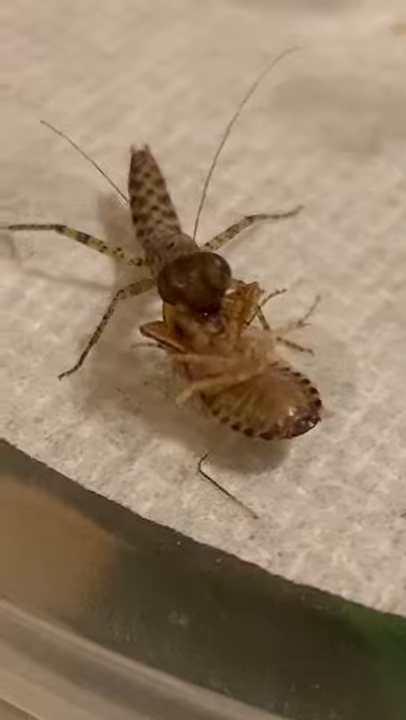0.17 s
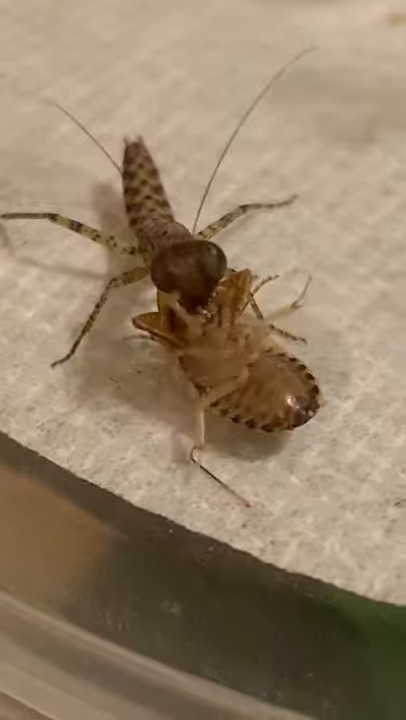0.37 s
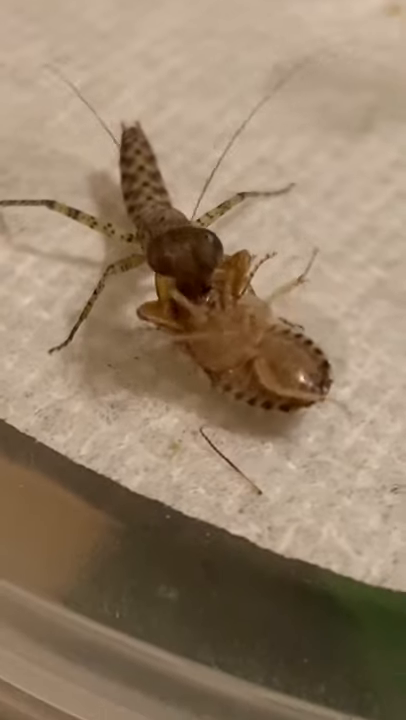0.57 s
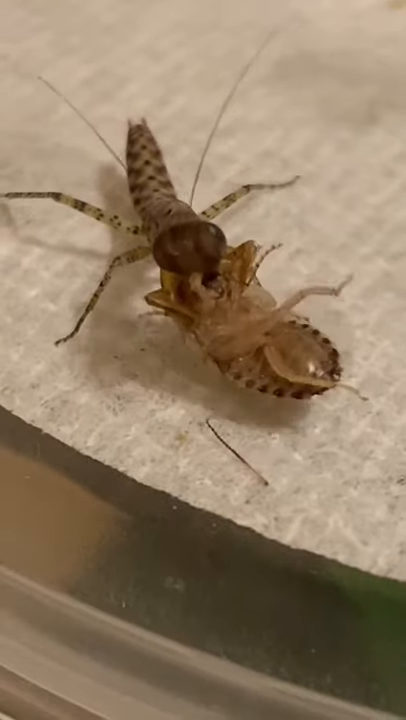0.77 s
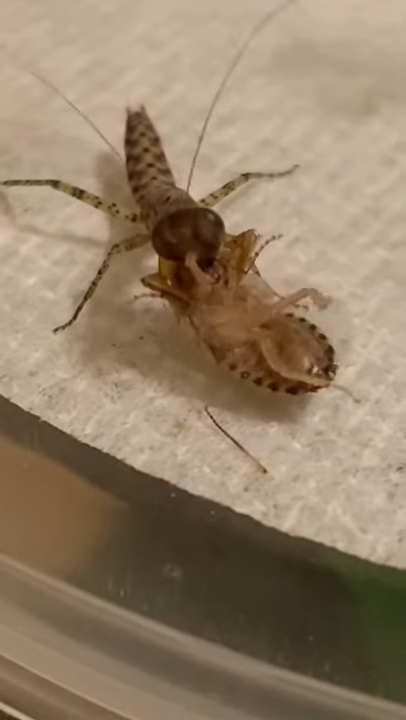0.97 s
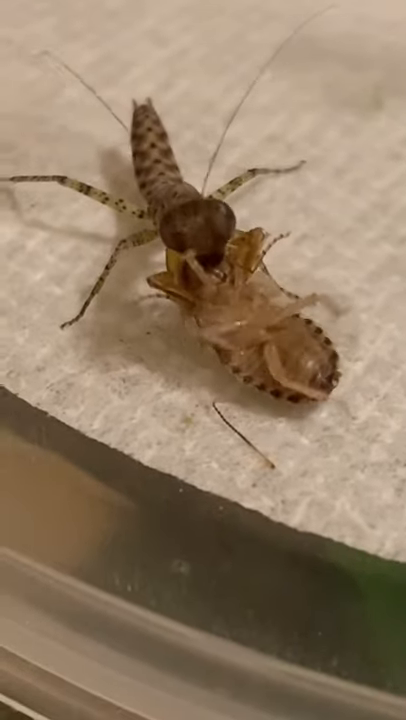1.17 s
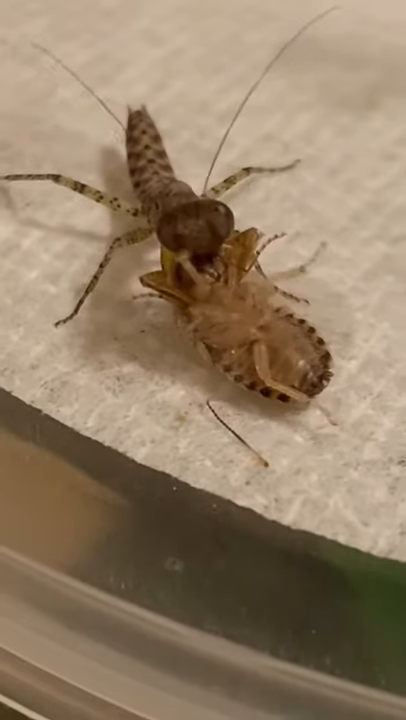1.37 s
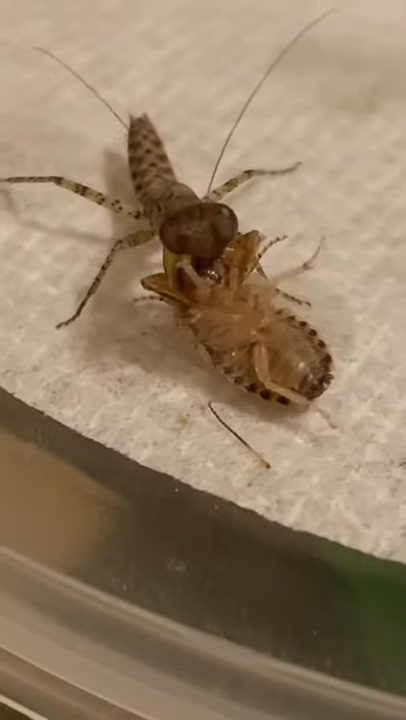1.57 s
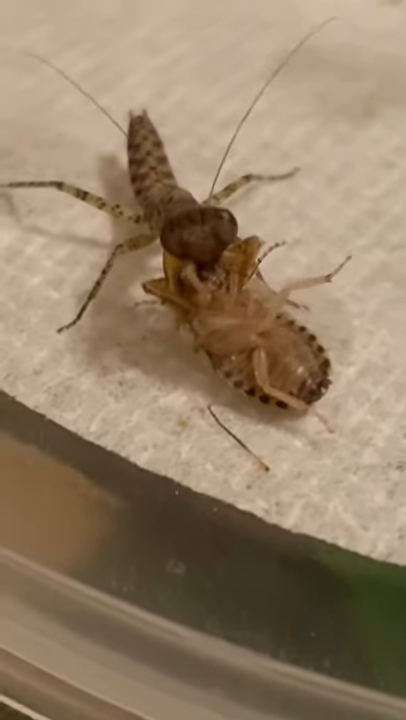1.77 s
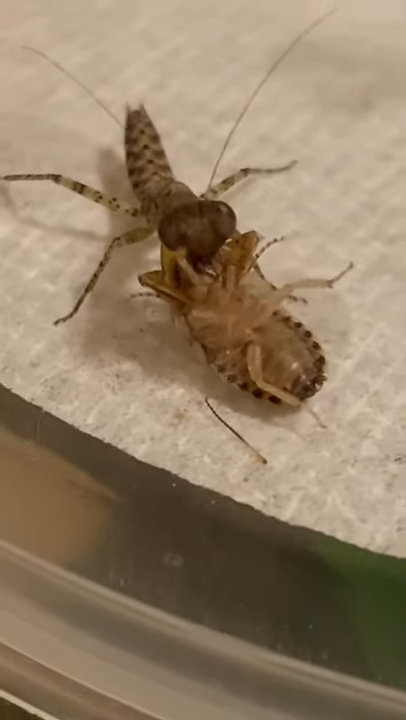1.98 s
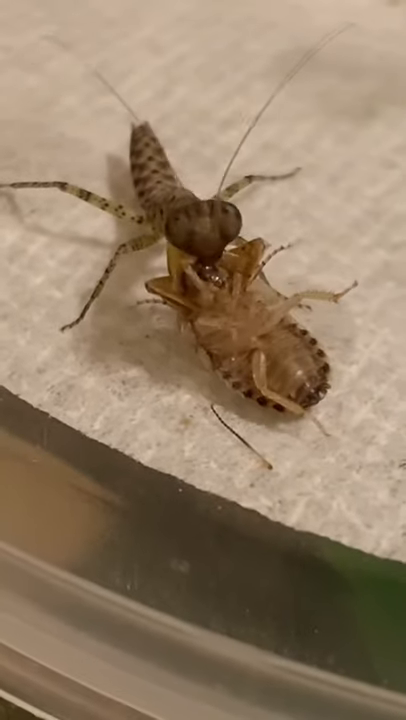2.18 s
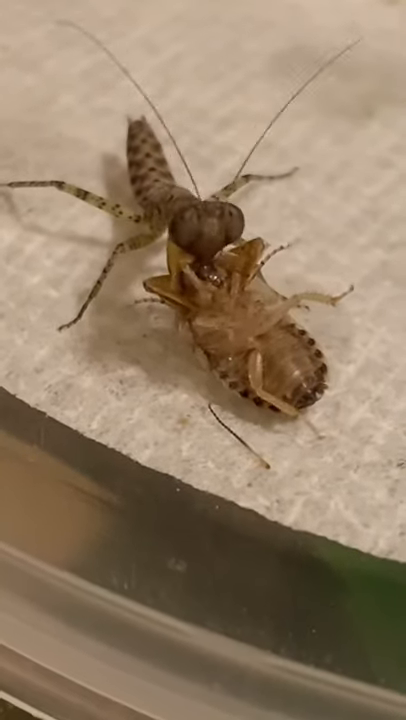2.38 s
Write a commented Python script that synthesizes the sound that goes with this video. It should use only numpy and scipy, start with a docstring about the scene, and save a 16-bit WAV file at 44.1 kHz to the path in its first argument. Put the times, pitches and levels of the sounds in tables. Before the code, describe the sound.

Tiny snaps and crackles of a mantis eating a roach in a plastic tub.

```python
"""Mantis eating a roach

A small mantis chews a roach on paper towel in a plastic tub, close to the microphone.
Bits of shell snap in sprays of clicks, the jaws grind out a fine crackle, legs scratch on the
paper, and a few dull taps ring the tub. Under it lie the room's rumble, hum and soft hiss."""
import sys
import numpy as np
from scipy import signal
from scipy.fft import rfft, irfft
from scipy.io import wavfile
from scipy.ndimage import uniform_filter1d

SR = 44100
rng = np.random.default_rng(int(sys.argv[2]) if len(sys.argv) > 2 else 0)


def dump_mix(stems):
    """Bounce the given channels to the path in sys.argv[1] as a 16-bit WAV at rate SR."""
    frames = np.atleast_2d(stems).T  # one column per channel
    limited = np.clip(frames, -1, 1)  # hard clip at full scale
    pcm = np.round(limited * 32767).astype(np.int16)
    wavfile.write(sys.argv[1], SR, pcm)


N = 111573
HZ = np.fft.rfftfreq(N, 1 / SR)


def amp(db):
    """Decibels to gain."""
    return 10 ** (np.asarray(db) / 20)


def unit(x):
    """Scales to rms 1."""
    return x / np.sqrt(np.mean(x ** 2) + 1e-20)


def curve(points, hz):
    """Reads a breakpoint curve on a log-frequency axis."""
    freqs, values = np.transpose(points)
    return np.interp(np.log(hz + 1), np.log(freqs + 1), values)


def add(mix, start_s, sound):
    """Drops a sound into the mix."""
    part = mix[round(start_s * SR):][:len(sound)]
    part += sound[:len(part)]


def click(eq_db, size=1024):
    """A click with a given EQ: its minimum-phase impulse response."""
    log_gain = np.log(amp(eq_db(abs(np.fft.fftfreq(size, 1 / SR)))))
    return np.fft.ifft(np.exp(np.conj(signal.hilbert(log_gain)))).real[:size // 2]


def white():
    """The spectrum of white noise."""
    return rng.standard_normal(len(HZ)) + 1j * rng.standard_normal(len(HZ))


def flicker(x, depth_db, patch_hz=450, patch_s=.035):
    """Shifts the tone colour at random from moment to moment."""
    spectrum = signal.stft(x, SR, nperseg=256)[2]
    patches = rng.standard_normal(spectrum.shape[-2:])
    patches = uniform_filter1d(patches, round(patch_hz * 256 / SR), axis=0)
    patches = uniform_filter1d(patches, round(patch_s * SR / 128), axis=1)
    return unit(signal.istft(spectrum * amp(depth_db * unit(patches)), SR, nperseg=256)[1][..., :N])


# Stereo balance (frequency [Hz], left minus right [dB])
BALANCE = [(60, 0.6), (160, -2.5), (600, -0.5), (2000, -.5), (2400, -5), (2700, -1.5), (4000, -0.5)]
# Phase offset between the microphones (frequency [Hz], left lead [rad])
PHASE_LEAD = [(60, 0), (420, .4), (600, 2.9), (880, 3.1), (1020, 1.2), (1400, .3), (2400, .9), (2700, 2.8),
              (3900, 1.5), (7900, 6.2), (9700, 6.4), (11600, 9.3), (15200, 11.5)]
def microphones(spectra):
    """Turns two spectra into stereo sound: the microphones differ in level and phase."""
    side = np.array([[.5], [-.5]])
    return irfft(spectra * amp(side * curve(BALANCE, HZ)) * np.exp(1j * side * curve(PHASE_LEAD, HZ)), N)


# Stereo image of the room noise (frequency [Hz], left-right coherence [0-1])
COHERENCE = [(50, 1), (300, 0.94), (500, 0.43), (700, 0.86), (1500, 0.23), (4000, 0.66), (7000, 0.95),
             (12000, 1), (15000, 1)]
def air(eq_db):
    """Steady coloured noise, partly alike in both microphones."""
    alike = np.clip(curve(COHERENCE, HZ), 0, 1)
    left = white()
    right = alike * left + np.sqrt(1 - alike ** 2) * white()
    return unit(microphones(np.array([left, right]) * amp(eq_db)))


# EQs of the room's rumble, drone and hiss (frequency [Hz], gain [dB])
RUMBLE_EQ = [(15, -42), (30, -32.5), (40, -7.5), (50, -2), (65, -7.5), (80, -3.5), (100, -22), (135, -15),
             (300, -58.5), (1000, -112)]
DRONE_EQ = [(40, -21.5), (90, -3.5), (145, 1.5), (170, -7.5), (205, -4), (335, -14), (385, -26.5),
            (480, -30), (560, -39), (1000, -58.5), (3000, -102)]
HISS_EQ = [(300, -3.5), (700, 4.5), (1060, 5), (1350, -1.5), (2000, -5), (2380, 0), (2800, -8.5),
           (3830, -1), (5200, -6), (6600, -1.5), (10300, -6.5), (16000, -11.5)]
# Fader ride on the rumble and hum (time [s], level [dB])
LOW_RIDE = [(.04, -39), (.11, -52.5), (.27, -40.5), (.37, -48.5), (.58, -52.5), (.66, -48), (.95, -52),
            (1.08, -41), (1.17, -55), (1.5, -48), (2.1, -51.5), (2.53, -47)]
def room_tone(hum_hz=75.55, hum_width_hz=8.3):
    """The bed: uneven rumble and hum, a steady drone above them, and soft hiss."""
    hum = air(-20 * np.log10(1 + ((HZ - hum_hz) / hum_width_hz * 2) ** 2))
    rumble = air(curve(RUMBLE_EQ, HZ))
    drone = air(curve(DRONE_EQ, HZ))
    hiss = flicker(air(curve(HISS_EQ, HZ)), depth_db=3.5)
    ride = amp(np.interp(np.arange(N) / SR, *np.transpose(LOW_RIDE)))
    return (amp(-3) * rumble + amp(-4) * hum) * ride + amp(-54.5) * drone + amp(-75) * hiss


# Reverb of the tub and room (frequency [Hz], T60 [s])
REVERB_DECAY = [(500, 0.15), (2500, 0.13), (7000, 0.088), (15000, 0.11)]
def in_tub(x, wet_db, wall_s=.0057, wall_db=-12.5):
    """Puts a sound in the tub: direct path, one echo off the wall and a short diffuse tail."""
    hz, t, noise = signal.stft(rng.standard_normal((2, 8192)), SR, nperseg=128)
    tails = signal.istft(noise * amp(-60 * t / curve(REVERB_DECAY, hz)[:, None]), SR, nperseg=128)[1]
    tails /= np.linalg.norm(tails, axis=1, keepdims=True)
    reverb = signal.fftconvolve(x[None], tails, axes=1)[:, :N]
    echo = amp(wall_db) * np.exp(-2j * np.pi * HZ * wall_s)
    return microphones(rfft(x) * (1 + echo) + amp(wet_db) * rfft(reverb))


def grains(eq, per_s, spread_db, clump_s=.087, clump_db=2):
    """A granular texture: tiny clicks of uneven size that swell in clumps."""
    clumps = unit(irfft(white() * np.exp(-(HZ * clump_s) ** 2), N))
    sizes = amp(spread_db * np.minimum(rng.exponential(1, N), 4) + clump_db * clumps)
    impulses = sizes * rng.choice([-1, 1], N) * (rng.random(N) < per_s / SR)
    texture = signal.fftconvolve(impulses, click(lambda hz: curve(eq, hz)))[:N]
    return flicker(texture, depth_db=4)


def bouts(rows):
    """An envelope in which each bout swells and fades in one broad arch."""
    envelope = np.zeros(N)
    for start, length, db in rows:
        progress = np.clip((np.arange(N) / SR - start) / length, 0, 1)
        envelope += amp(db) * (4 * progress * (1 - progress)) ** .43
    return envelope


def spray(decay_s, per_s=6000, size=1024):
    """One impulse and a quickly dying spray of smaller ones."""
    t = np.arange(size) / SR
    debris = rng.standard_normal(size) * (rng.random(size) < per_s / SR) * np.exp(-t / decay_s)
    return (t == 0) + .48 * debris


# Leg strokes on the paper (start [s], length [s], scuff level [dB], rasp level [dB])
LEG_STROKES = [(0.006, 0.16, -73.5, -78), (0.153, 0.2, -80.5, -88), (0.356, 0.1, -83.5, -81),
               (0.602, 0.06, -72.5, -106), (0.699, 0.11, -79.5, -93), (0.8, 0.16, -75.5, -77),
               (0.935, 0.2, -77.5, -86.5), (1.127, 0.16, -78.5, -78.5), (1.366, 0.1, -89, -84.5),
               (1.69, 0.19, -74, -84), (1.885, 0.24, -84, -75), (2.18, 0.073, -81, -76),
               (2.266, 0.056, -71, -80), (2.346, 0.14, -74, -80)]
# EQs of the scuff and the rasp (frequency [Hz], gain [dB])
SCUFF_EQ = [(400, -7.5), (750, -4), (1050, 3), (1350, -10.5), (2050, -15), (2380, -5), (2750, -13.5),
            (4800, -11.5), (7000, -28.5)]
RASP_EQ = [(2000, -19), (2900, -11.5), (3400, -3), (3830, 7.5), (4500, -4), (5300, -7), (8000, -23.5)]
def leg_scratches():
    """Legs catch on the paper: a dull scuff through the tub and a brighter rasp."""
    starts, lengths, scuff_db, rasp_db = np.transpose(LEG_STROKES)
    scuff = bouts(zip(starts, lengths, scuff_db)) * grains(SCUFF_EQ, per_s=900, spread_db=4.5)
    rasp = bouts(zip(starts, lengths, rasp_db)) * grains(RASP_EQ, per_s=900, spread_db=4.5)
    return in_tub(scuff + rasp, wet_db=-3.5)


# Tap cues (time [s], level [dB], tilt [dB/octave], skid decay [s], crack against ring [dB])
TAP_CUES = [(0.0972, -30.5, -5.5, 0.00011, -5.5), (0.324, -45.5, 7, 0.0041, 2),
            (1.1368, -48.5, 11, 0.0025, -1), (1.2245, -46.5, 7, .003, -6), (1.527, -43, -1, 0.00047, -14),
            (1.7735, -43, -18, 0.0027, -18), (1.822, -44, 1, 0.0012, -7), (1.916, -47, 1, 0.0018, 1),
            (1.9906, -41, -12.5, 0.00023, -18)]
# Modes of the plastic tub (frequency [Hz], level [dB], T60 [s])
TUB_MODES = [(1046, -7, 0.0081), (1330, -11.5, 0.008), (1740, 1, 0.0066), (2364, 2, 0.011),
             (2970, -16.5, 0.003), (3360, -12, 0.0066), (3840, -11, 0.014)]
# EQ of the dry crack that starts a tap (frequency [Hz], gain [dB])
TAP_CRACK_EQ = [(600, -23.5), (2200, 2.5), (3800, -1), (4500, -16), (15000, -26)]
def tub_taps(rise_s=.00024):
    """Each light knock cracks, skids briefly and rings the modes of the tub."""
    track, t = np.zeros(N), np.arange(2048) / SR
    crack = unit(click(lambda hz: curve(TAP_CRACK_EQ, hz), size=2 * len(t)))
    attack = 1 - np.exp(-(t / rise_s) ** 2)
    for start, db, tilt_db, skid_s, crack_db in TAP_CUES:
        ring = np.zeros(len(t))
        for k, (hz, mode_db, t60) in enumerate(TUB_MODES):
            envelope = amp(mode_db + tilt_db * np.log2(hz) - 60 * t / t60)
            ring += (-1) ** k * envelope * np.sin(2 * np.pi * hz * t)
        knock = np.convolve(unit(ring * attack) + amp(crack_db) * crack, spray(skid_s))
        add(track, start, amp(db) * knock / np.linalg.norm(knock))
    return in_tub(track, wet_db=-6)


# Bouts of chewing (start [s], length [s], level [dB])
CHEW_BOUTS = [(0.02, 0.1, -68), (0.19, 0.05, -75), (0.35, 0.057, -73), (0.49, 0.023, -79),
              (0.615, 0.022, -79), (0.715, 0.057, -77.5), (0.8, 0.092, -79.5), (0.93, 0.035, -75),
              (1.09, 0.16, -76.5), (1.265, 0.11, -78.5), (1.375, 0.05, -76), (1.69, 0.15, -76),
              (1.82, 0.049, -79), (1.945, 0.055, -71), (2.04, 0.091, -75.5), (2.185, 0.093, -70),
              (2.275, 0.072, -72), (2.37, 0.056, -72.5), (2.425, 0.072, -69)]
# EQ of the crackle (frequency [Hz], gain [dB])
CHEW_EQ = [(2800, -40), (3850, -14.5), (5500, -7.5), (6400, 5.5), (7300, -1), (8000, -4.5), (8800, -6.5),
           (10500, -13.5), (12000, -19.5), (14500, -10), (16000, -11)]
def chewing():
    """Jaws grind the shell to a fine crackle, with crisp separate ticks as they slip."""
    crackle = grains(CHEW_EQ, per_s=1800, spread_db=3.5)
    slips = amp(-10) * grains(CHEW_EQ, per_s=220, spread_db=3.5)
    return in_tub(bouts(CHEW_BOUTS) * (crackle + slips), wet_db=-3.5)


# Snap cues (time [s], level [dB], pitch [Hz], spray decay [s])
SNAP_CUES = [(0.087, -51, 7700, .001), (0.2305, -48, 8300, 0.00082), (0.4557, -38.5, 8300, 0.0011),
             (0.466, -45, 3350, 0.0023), (0.6222, -47, 6300, 0.0019), (0.635, -49, 6200, 0.00088),
             (0.871, -47, 6740, 0.00092), (0.8865, -41, 5500, 0.0034), (1.1, -46.5, 6940, 0.0025),
             (1.107, -53, 6930, 0.0015), (1.136, -50, 7050, 0.0011), (1.18, -48, 7000, .001),
             (1.478, -49, 6700, 0.0017), (1.7786, -41.5, 6660, 0.0012), (1.822, -37, 7900, 0.0049),
             (1.8194, -38.5, 3230, 0.0019), (1.9168, -41.5, 7240, 0.0008), (2.189, -41, 7060, 0.0036),
             (2.21, -50, 6800, .001), (2.221, -49, 7200, 0.00043), (2.231, -38.5, 6760, 0.00041),
             (2.423, -44.5, 6740, 0.0008), (2.4747, -57, 7200, 0.0012), (2.5259, -41.5, 7100, 0.0017)]
# EQ of breaking shell (frequency [Hz], gain [dB])
SHELL_EQ = [(500, -53), (1500, -10), (3000, 4.5), (4000, 11.5), (6500, 12), (9000, -2), (12000, 8),
            (16000, -16)]
def shell_snaps(skirt_db=-21.5):
    """Shell breaks in a spray of clicks, coloured around the pitch of the crack."""
    track = np.zeros(N)
    for start, db, pitch_hz, decay_s in SNAP_CUES:
        width_oct = .42 * 2 ** ((db + 43.5) / 10.5)  # harder snaps are broader

        def crack_eq(hz):
            bell = np.exp(-(np.log2((hz + 1) / pitch_hz) / width_oct) ** 2)
            return curve(SHELL_EQ, hz) + 20 * np.log10(amp(skirt_db) + bell)

        snap = np.convolve(spray(decay_s), click(crack_eq))
        add(track, start, amp(db) * snap / np.linalg.norm(snap))
    return in_tub(track, wet_db=-5.5)


def scene():
    """The feeding insect in its quiet room."""
    return room_tone() + tub_taps() + shell_snaps() + chewing() + leg_scratches()


def record(dry, silence_s=.036, cutoff_hz=15800):
    """Mutes the first instant and cuts the extreme top."""
    gated = dry * (np.arange(N) / SR >= silence_s)
    lowpass = signal.firwin(511, cutoff_hz, window=("kaiser", 9), fs=SR)
    return signal.oaconvolve(gated, lowpass[None], "same")


dry = scene()
out = record(dry)
dump_mix(out)
```